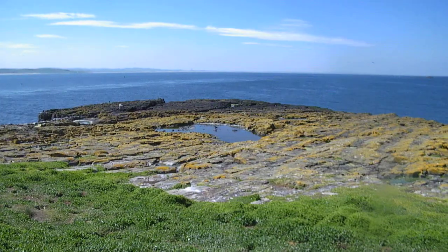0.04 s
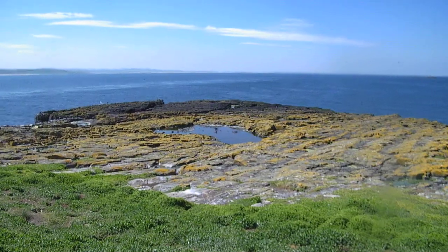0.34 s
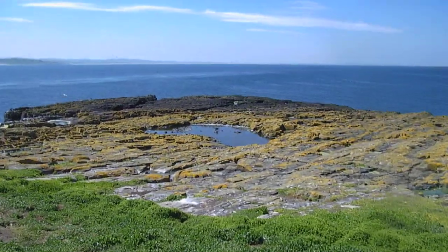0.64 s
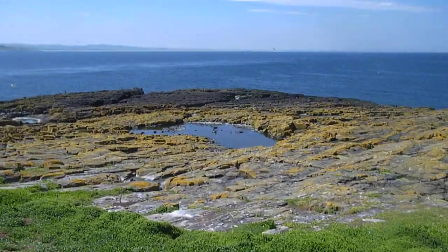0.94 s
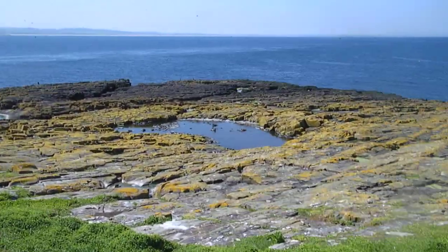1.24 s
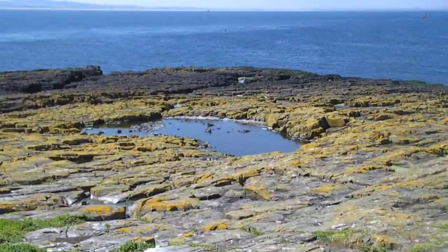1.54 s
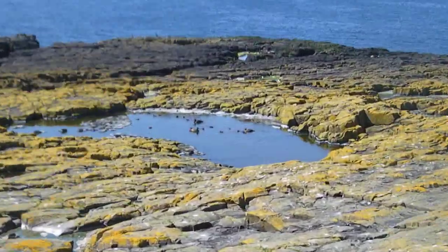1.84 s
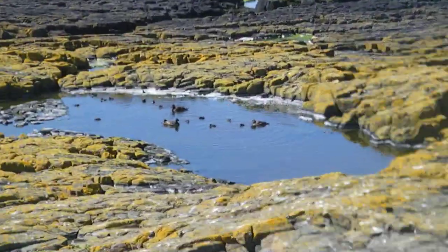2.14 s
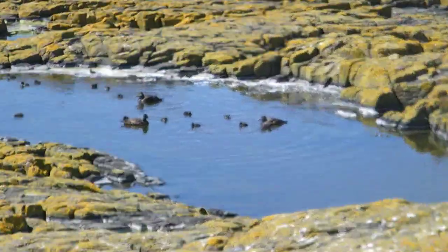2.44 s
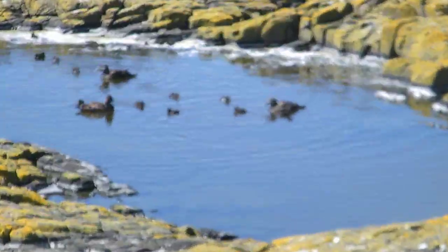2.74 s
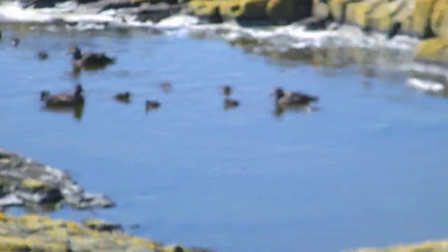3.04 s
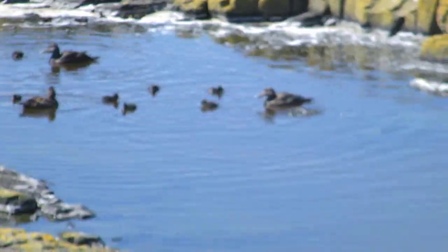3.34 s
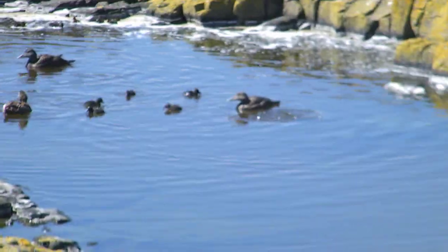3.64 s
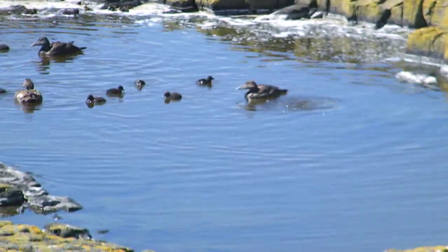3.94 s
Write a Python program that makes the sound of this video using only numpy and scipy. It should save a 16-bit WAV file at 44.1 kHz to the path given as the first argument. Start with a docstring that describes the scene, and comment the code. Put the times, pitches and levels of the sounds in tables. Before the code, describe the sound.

Gusts of wind buffet the microphone beside a softly washing sea. Close up, a lens ticks and a zoom motor quietly whirrs as gulls cry some way off, with short tern rattles near the end.

```python
"""Windy shore with gulls and terns

Wind buffets a camera microphone on a rocky shore, rumbling and thumping over the wash of the sea.
Gulls wail and terns chatter from a colony some way off: arched tones, chopped into a rasp, that echo
off the rocks. Close up, the lens ticks and its zoom motor whirrs in tiny steps.
The camera notches out two bands of the treble and overloads on the hardest gusts."""
import sys
import numpy as np
from scipy import signal
from scipy.fft import rfft, irfft
from scipy.io import wavfile
from scipy.ndimage import uniform_filter1d

SR = 44100
rng = np.random.default_rng(int(sys.argv[2]) if len(sys.argv) > 2 else 0)


def bounce(signal):
    """Save signal as a 16-bit WAV file at the path given by the first command-line argument."""
    frames = np.transpose(np.atleast_2d(signal))
    limited = np.clip(frames, -1, 1)
    pcm = np.round(limited * 32767).astype(np.int16)
    wavfile.write(sys.argv[1], SR, pcm)


N = 176400
TIME = np.arange(N) / SR

# steady breeze and single gusts at the microphone (time [s], relative level [dB])
BREEZE = [(0, -20.5), (.18, -34.5), (.72, -26), (1.15, -19.5), (1.66, -22), (2.2, -20), (2.82, -22.5),
          (3.0, -27.5), (3.69, -25), (4, -18.5)]
GUSTS = [(0.097, -26), (.545, -18), (.85, -18), (1.158, -15), (1.231, -15), (1.275, -17.5), (1.329, -18),
         (1.399, -13), (1.509, -11.5), (1.564, -20), (1.598, -26), (1.749, -16.5), (1.79, -11), (1.839, -8),
         (2.1, -15.5), (2.156, -14.5), (2.185, -12.5), (2.242, -15.5), (2.498, -11.5), (2.533, -16),
         (2.566, -10.5), (2.672, -19), (2.77, -25), (3.132, -15), (3.177, -15.5), (3.44, -13),
         (3.498, -12.5), (3.617, -13.5), (3.762, -16), (3.815, -18.5), (3.954, -16)]
# zoom motor fader, lens ticks and cracks on gusts (time [s], level [dB])
ZOOM_FADER = [(.25, -56), (.38, -44.5), (.62, -38.5), (1.39, -37), (1.43, -42), (1.76, -40), (1.87, -45.5),
              (1.98, -38), (2.94, -44.5), (3.288, -38), (3.33, -95)]
TICKS = [(0.156, -25.5), (.362, -28), (.424, -27), (2.746, -28.5), (3.94, -31)]
CRACKS = [(1.396, -34.5), (1.842, -34.5), (2.668, -43.5)]
# tone colour of each noise layer (frequency [Hz], relative level [dB])
RUMBLE_EQ = [(15, -30), (48, 4.5), (125, -0.5), (220, -17), (6000, -100)]
FLUTTER_EQ = [(30, -13), (110, 3.5), (170, -1), (250, -7.5), (1000, -43.5), (16000, -100)]
SEA_EQ = [(100, -22), (650, 5.5), (1200, -4), (2000, 6), (2600, -1), (5800, -3), (6800, -6.5), (8200, -21),
          (15000, -28)]
MOTOR_EQ = [(900, -10.5), (5200, -8.5), (6400, 3.5), (7400, -19), (8500, -10), (9400, -20.5), (11600, -21),
            (13800, -37)]
TICK_EQ = [(3500, -25), (5900, 10), (8500, -12), (16000, -33)]
CRACK_EQ = [(900, -8), (2000, -10), (16000, -29)]
# gruff low calls and thin, high gull overtones (time [s], length [s], pitch [Hz], level [dB])
GRUNTS = [(.01, .14, 692, -45.5), (0.313, 0.035, 453, -44.5), (0.473, 0.032, 504, -41.5),
          (1.131, .19, 589.3, -39), (3.457, 0.19, 692, -47.5)]
GULL_OVERTONES = [(0.193, 0.35, 3320, -49), (1.14, 0.22, 3360, -47), (3.422, .24, 3400, -56)]
# gull wails (time [s], length [s], start pitch [Hz], middle pitch [Hz], end pitch [Hz],
# level [dB], rasp [0-1], brightness [dB])
GULL_WAILS = [(.2, 0.23, 1014, 1059, 1006, -42, 0.94, 9), (0.615, 0.23, 991, 928, 895, -43.5, 1, -14),
              (0.982, .06, 1040, 1043, 1083, -32.5, 0.71, 9), (1.042, 0.11, 1085, 1116, 1160, -38, .55, 8),
              (1.123, 0.067, 837, 917, 960, -38.5, 1, -22), (1.204, 0.11, 998, 1048, 1050, -32, 0.68, 12.5),
              (1.313, 0.14, 1056, 1126, 1158, -40, 0.4, 9), (1.466, 0.13, 971, 1056, 1023, -36, 0.65, 13),
              (1.595, 0.0632, 1059, 1108, 1050, -34.5, 0.74, 16),
              (1.654, .14, 1066, 1109, 1040, -40.5, .45, -9), (1.812, 0.19, 976, 1067, 1060, -39, 0.78, -3),
              (2.22, .2, 923, 921, 972, -46.5, 0.5, -7), (2.925, .33, 1068, 1007, 905, -45, 0.68, 10)]
# tern rattles (time [s], length [s], start pitch [Hz], end pitch [Hz],
# level [dB], brightness [dB], pulse rate [Hz])
TERN_RATTLES = [(.856, 0.039, 1280, 1480, -32.5, -7.5, 93), (0.902, 0.077, 1315, 1254, -38, -6, 47),
                (3.666, 0.03, 1363, 1547, -41, 0, 89), (3.727, 0.055, 1321, 1414, -42.5, 2, 37.3),
                (3.863, 0.049, 1445, 1324, -34, 4.5, 87)]
# clear tern notes (time [s], length [s], start pitch [Hz], middle pitch [Hz], end pitch [Hz],
# level [dB], brightness [dB])
TERN_NOTES = [(1.049, 0.035, 1290, 1364, 1300, -37, -14), (3.699, 0.027, 1490, 1503, 1470, -39, -6),
              (3.787, 0.04, 1303, 1316, 1430, -37, 0), (3.826, 0.048, 1398, 1430, 1307, -39, 0)]
# harmonics of each voice, from the fundamental up (relative level [dB])
GULL_HARMONICS = [-1, 11, -19, -14, -12, -11.5]
GRUNT_HARMONICS = [-1.7, 0, -5.5]
TERN_HARMONICS = [-10.5, -1, -1.5, -4.5, -15]
# the camera's treble notches (centre [Hz], width [Hz])
NOTCHES = [(4830, 233), (7700, 1100)]


def amp(db):
    """Decibels to gain."""
    return 10 ** (np.asarray(db) / 20)


def unit(x):
    """Scales to rms 1."""
    return x / np.sqrt(np.mean(x ** 2) + 1e-20)


def fader(points):
    """Straight ramps between (time, level) points."""
    return np.interp(TIME, *np.transpose(points))


def swells(points, sigma_s):
    """A bell-shaped swell of gain at each (time, level) point."""
    return sum(amp(db) * np.exp(-.5 * ((TIME - s) / sigma_s) ** 2) for s, db in points)


def colour(x, eq):
    """Shapes x with an EQ curve, at rms 1."""
    hz, db = np.transpose(eq)
    f = np.fft.rfftfreq(len(x), 1 / SR)
    gain = amp(np.interp(np.log(f + 1), np.log(hz), db))
    return unit(irfft(rfft(x) * gain, len(x)))


def noise(eq):
    """A steady bed of coloured noise."""
    return colour(rng.standard_normal(N), eq)


def wander(rate_hz, length=N):
    """Random drift up to about rate_hz, at an rms near 1."""
    f = np.fft.rfftfreq(N, 1 / SR)
    return unit(irfft(rfft(rng.standard_normal(N)) * np.exp(-(f / rate_hz) ** 2), N))[:length]


def track(cues):
    """Lays (time, sound) cues on one track; any cued before zero start at zero."""
    out = np.zeros(N)
    for s, sound in cues:
        part = out[max(round(s * SR), 0):][:len(sound)]
        part += sound[:len(part)]
    return out


def turbulence(eq, samples):
    """Noise with its level ridden flat over a window of samples."""
    x = noise(eq)
    power = uniform_filter1d(uniform_filter1d(x ** 2, samples), samples)
    return x / np.sqrt(power + 1e-6)


def wind(rumble_gain_db=1, flutter_db=-20, lull_db=2.5, eddy_db=3.5):
    """Rumble follows the wind; a higher flutter grows faster with it, so gusts thump the microphone."""
    breeze = amp(fader(BREEZE) + lull_db * wander(14))
    gusts = swells(GUSTS, sigma_s=.009)
    rumble = np.hypot(breeze, .34 * gusts) * turbulence(RUMBLE_EQ, samples=1600)
    force = np.hypot(.55 * breeze * amp(eddy_db * wander(55)), gusts)
    flutter = unit(force ** 1.14 * turbulence(FLUTTER_EQ, samples=500))
    return amp(rumble_gain_db) * rumble + amp(flutter_db) * flutter


def sea(db=-43):
    """The steady wash of distant water."""
    return amp(db) * noise(SEA_EQ)


def call(length, start_hz, middle_hz, end_hz, db, rasp, bright_db=0, pulse_hz=88,
         harmonics=GULL_HARMONICS, pulse_s=.0027, chirp=.13, unevenness=.17):
    """A bird voice, a gull by default: an arched tone that rasp chops into upward-flicking pulses."""
    t = np.arange(0, length, 1 / SR)
    arch_hz = np.polyval(np.polyfit([0, .5, 1], [start_hz, middle_hz, end_hz], 2), t / length)
    pulse_count = np.cumsum(pulse_hz * (1 + unevenness * wander(41.7, len(t)))) / SR
    from_peak = pulse_count % 1 - .5
    pulses = 1 - rasp + rasp * np.exp(-.5 * (from_peak / pulse_hz / pulse_s) ** 2)
    jitter = .021 * (wander(350, len(t)) + wander(40.5, len(t)))
    cycles = np.cumsum(arch_hz * (1 + rasp * (chirp * from_peak + jitter))) / SR
    tone = np.zeros(len(t))
    for k, harmonic_db in enumerate(harmonics, 1):
        gain = amp(harmonic_db + bright_db * (k > 2))
        odd_gain = .5 + .5 * rasp if k % 2 else 1  # rasp brings out the odd harmonics
        tone += gain * odd_gain * np.sin(2 * np.pi * (k * cycles + rng.random()))
    attack_s, release_s = .0042, .0023
    envelope = np.clip(np.minimum(t / attack_s, (length - t) / release_s), 0, 1)
    waver = amp(2 * wander(66, len(t)))
    return amp(db) * unit(tone * pulses * envelope * waver)


def colony(count=30, centre_hz=980, spread=.14):
    """A bed of faint, scattered gull calls from far off."""
    cues = []
    for slot, (offset, size, pitch) in enumerate(rng.random((count, 3))):
        s = (slot + offset - 2) * N / SR / count
        hz = centre_hz * (1 + spread * (2 * pitch - 1))
        cues.append((s, call(.1 * (1 + size), .88 * hz, hz, .88 * hz, db=-55.5, rasp=.5)))
    return track(cues)


def grunts():
    """Low, gruff calls that rise in ragged pulses."""
    voice = dict(rasp=.99, harmonics=GRUNT_HARMONICS, chirp=.32, unevenness=.298)
    return track((s, call(length, .8 * hz, hz, 1.08 * hz, db, **voice)) for s, length, hz, db in GRUNTS)


def rocks(x, echo_db=-7, t60_s=.22, predelay_s=.005):
    """Adds a short, diffuse echo off the rocks."""
    t = TIME[:SR // 2]
    tail = rng.standard_normal(len(t)) * amp(-60 * t / t60_s) * (t > predelay_s)
    return x + amp(echo_db) * signal.fftconvolve(x, tail / np.linalg.norm(tail))[:N]


def zoom_motor(steps_per_s=320):
    """Each motor step is a puff of gear noise, with an accent every third step."""
    steps = np.cumsum(steps_per_s * (1 + .017 * wander(2))) / SR
    puffs = .25 + np.exp(-(steps % 1) / .29)
    accent = 1 + .18 * np.cos(2 * np.pi * steps / 3)
    return amp(fader(ZOOM_FADER)) * colour(puffs * accent * rng.standard_normal(N), MOTOR_EQ)


def lens_ticks(decay_s=.0022):
    """The lens mechanism ticks in tiny, bright bursts of noise."""
    t = TIME[:2048]
    decay = np.exp(-t / decay_s)
    return track((s, amp(db) * decay * colour(rng.standard_normal(len(t)), TICK_EQ)) for s, db in TICKS)


def gull_overtones():
    """A resonance of the gull voice rings as one thin, high, wavering overtone."""
    return track((s, call(length, .95 * hz, hz, .95 * hz, db, rasp=.64, harmonics=[0]))
                 for s, length, hz, db in GULL_OVERTONES)


def gulls():
    """The nearer gulls wail, from fairly clear to hoarse."""
    return track((s, call(*wail)) for s, *wail in GULL_WAILS)


def terns(rattle_rasp=.88, note_rasp=.397):
    """Shrill chatter: heavy rasp breaks a note into an even rattle, light rasp leaves it clear."""
    voice = dict(harmonics=TERN_HARMONICS, pulse_s=.0014, chirp=.32, unevenness=0)
    cues = []
    for s, length, start_hz, end_hz, db, bright_db, pulse_hz in TERN_RATTLES:
        glide = start_hz, (start_hz + end_hz) / 2, end_hz
        cues.append((s, call(length, *glide, db, rattle_rasp, bright_db, pulse_hz, **voice)))
    for s, *note, bright_db in TERN_NOTES:
        cues.append((s, call(*note, note_rasp, bright_db, **voice)))
    return track(cues)


def cracks():
    """A brief crack of noise tops a few of the gusts."""
    return swells(CRACKS, sigma_s=.004) * noise(CRACK_EQ)


def scene():
    """Wind, sea, birds and lens in mono; only the birds get the echo."""
    weather = wind() + cracks() + sea()
    birds = gulls() + terns() + grunts() + gull_overtones() + colony()
    return (weather + rocks(birds) + zoom_motor() + lens_ticks())[None]


def record(dry):
    """The camera soft-clips on gusts, notches the treble, adds a faint whine and cuts the very top."""
    ceiling, cutoff_hz = .71, 15820
    whine_hz, whine_db = 15465, -72
    x = dry / (1 + (dry / ceiling) ** 10) ** (1 / 10)
    for hz, width_hz in NOTCHES:
        x = signal.lfilter(*signal.iirnotch(hz, hz / width_hz, SR), x)
    whine = amp(whine_db) * np.sqrt(2) * np.sin(2 * np.pi * whine_hz * TIME)
    lowpass = signal.firwin(801, cutoff_hz, window=("kaiser", 9), fs=SR)
    return signal.oaconvolve(x + whine, lowpass[None], "same")


dry = scene()
out = record(dry)
bounce(out)
```